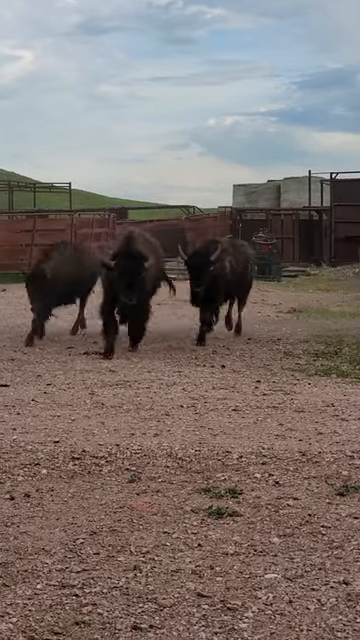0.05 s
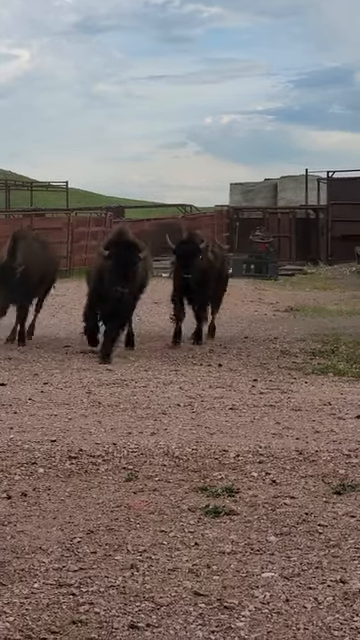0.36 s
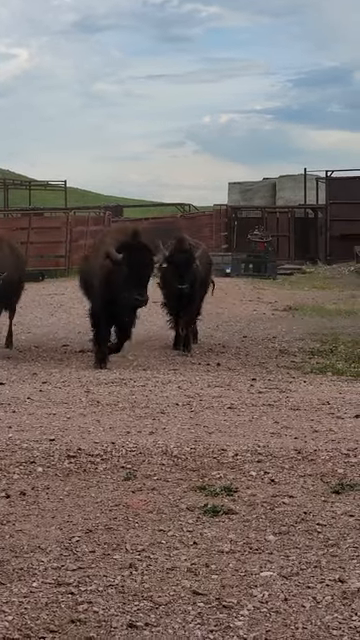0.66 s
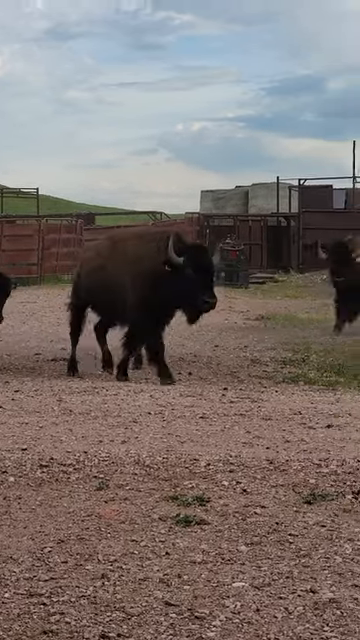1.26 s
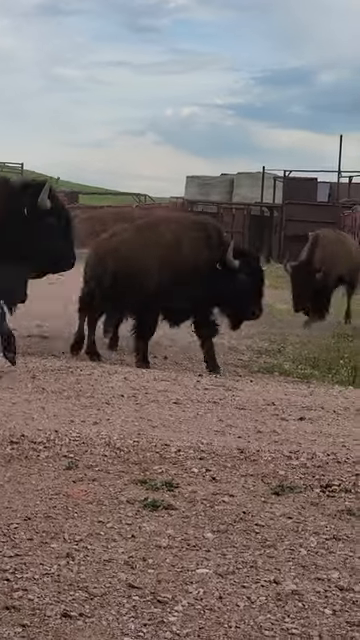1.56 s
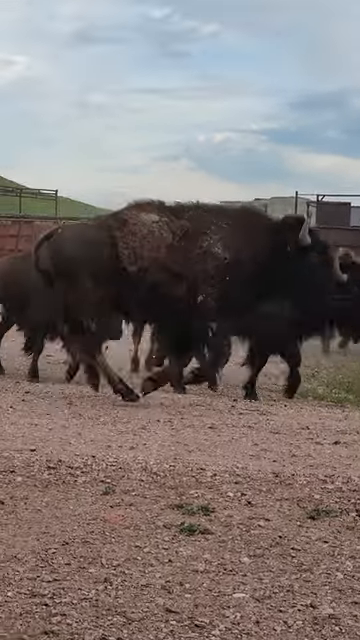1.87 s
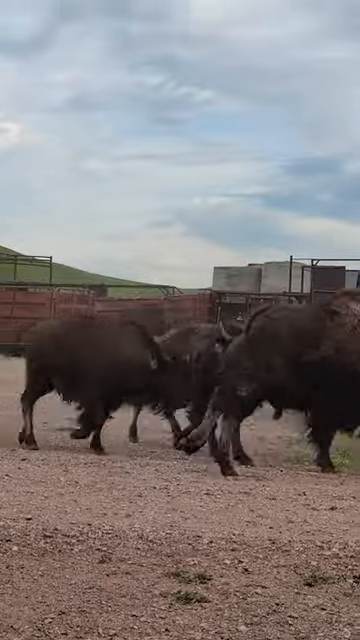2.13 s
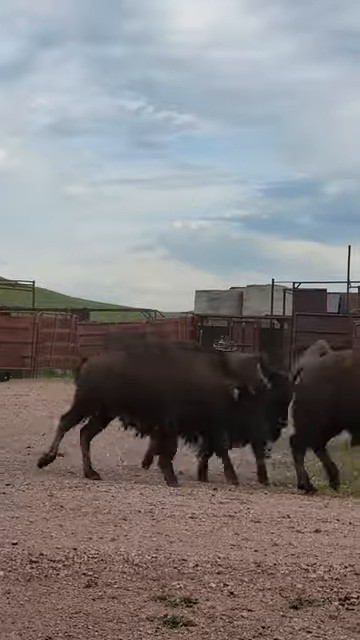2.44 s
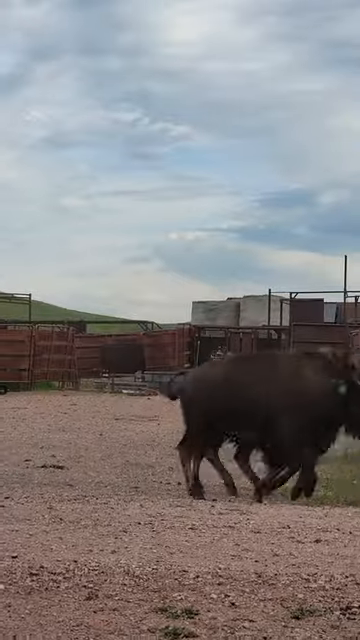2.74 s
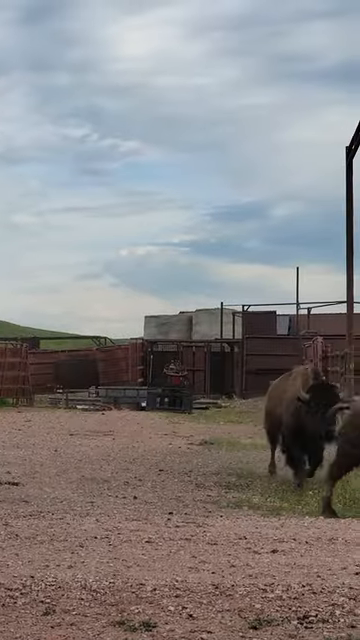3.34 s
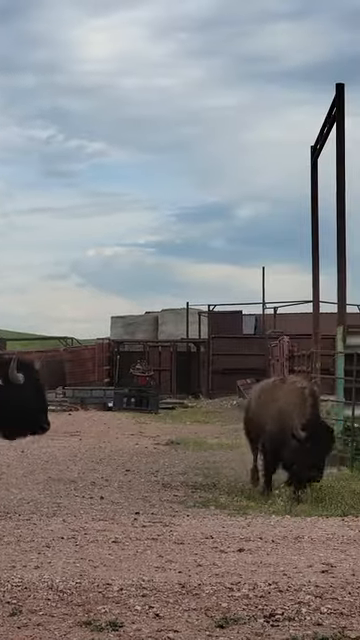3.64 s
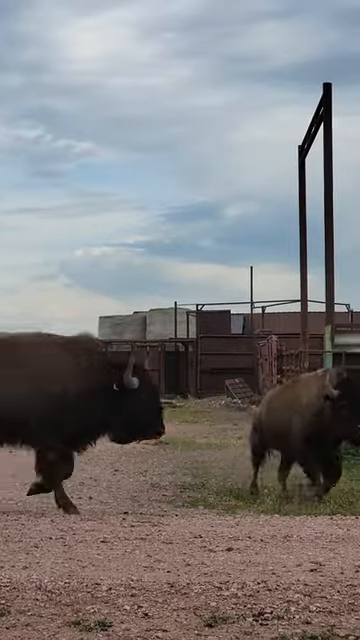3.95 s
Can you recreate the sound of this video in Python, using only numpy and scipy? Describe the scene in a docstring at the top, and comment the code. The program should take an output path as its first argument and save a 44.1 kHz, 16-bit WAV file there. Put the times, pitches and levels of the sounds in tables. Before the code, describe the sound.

Bison hooves thudding, clacking and crunching on gravel as the animals trot past outdoors.

```python
"""Bison trot past on a gravel yard: hooves thud on the ground, knock stones together and crunch the grit.
The animals snort through chest and nose, once farther off, then twice close by.
A bird whistles twice and a bit of metal tinkles; fences and sheds answer faintly.
An engine idles some way off and wind rumbles and thumps on the microphone."""
import sys
import numpy as np
from scipy import signal
from scipy.fft import rfft, irfft, next_fast_len
from scipy.io import wavfile
from scipy.ndimage import map_coordinates

SR = 44100
rng = np.random.default_rng(int(sys.argv[2]) if len(sys.argv) > 2 else 0)


def file_out(sig):
    """Save sig as 16-bit WAV at sys.argv[1]."""
    # one column per channel
    cols = np.atleast_2d(sig).T
    # limit, then scale
    lim = np.clip(cols, -1, 1)
    pcm = np.round(lim * 32767).astype(np.int16)
    wavfile.write(sys.argv[1], SR, pcm)


N = 176400
TIME_S = np.arange(N) / SR
EVENT_N = SR // 4
AGE_S = np.arange(EVENT_N) / SR


def amp(db):
    """Decibels to gain."""
    return 10 ** (np.asarray(db) / 20)


def unit(x):
    """Scale to rms 1."""
    return x / np.sqrt(np.mean(x ** 2) + 1e-20)


def fade(t60, t=AGE_S):
    """Exponential decay, 60 dB down at t60."""
    return amp(-60 * t / t60)


def curve(rows, column=1):
    """One column of a time table, per sample."""
    rows = np.array(rows)
    return np.interp(TIME_S, rows[:, 0], rows[:, column])


def gate(rows):
    """Open between a table's first and last time."""
    return (TIME_S > rows[0][0]) & (TIME_S < rows[-1][0])


def wobble(rate_hz):
    """Smooth random drift, rms near 1."""
    return map_coordinates(rng.standard_normal(int(4 * rate_hz) + 5), [TIME_S * rate_hz])


def filtered(x, response):
    """Apply a frequency response."""
    size = next_fast_len(x.shape[-1] + 8192)
    spectrum = rfft(x, size) * response(np.fft.rfftfreq(size, 1 / SR))
    return irfft(spectrum, size)[..., :x.shape[-1]]


def noise(spectrum):
    """Two independent shaped noises, rms 1."""
    hz, db = np.transpose(spectrum)
    white = rng.standard_normal((2, N))
    return unit(filtered(white, lambda f: amp(np.interp(np.log(f + 1), np.log(hz + 1), db))))


def pan(x, left_db):
    """Set the left level relative to the right."""
    return x * amp(np.array([[left_db], [-left_db]]) / 2)


def spread(pair, side_db):
    """Mid and side to left and right."""
    return pair[0] + amp(side_db) * pair[1] * np.array([[1], [-1]])


def add(out, start_s, x):
    """Mix x in at start_s."""
    i = max(round(start_s * SR), 0)
    out[:, i:i + x.shape[-1]] += x[..., :max(N - i, 0)]


def puff(hz):
    """Short stereo noise in a broad band around hz."""
    white = rng.standard_normal((2, EVENT_N))
    band = filtered(white, lambda f: (f / hz) ** 2 / (1 + 1j * f / hz) ** 5)
    return spread(unit(band), side_db=-7)


def grains(n, per_s, hz, t60_cycles, scatter, size_db, side_db):
    """Stereo cloud of tiny damped rings of random pitch, size and place."""
    count = int(per_s * n / SR) + 1
    draws = np.random.default_rng(rng.integers(1 << 30)).random((count, 4))
    onset, pitch, size, place = np.hsplit(draws, 4)
    detune = np.log((pitch + 1e-6) / (1 + 1e-6 - pitch)) / np.sqrt(np.pi)  # logistic distribution
    grain_hz = np.clip(hz * np.exp(scatter * detune), hz / 4, SR / 3)
    offsets = np.arange(int(2 * t60_cycles * SR / hz))
    cycles = grain_hz * offsets / SR
    rings = np.sin(2 * np.pi * cycles) * fade(t60_cycles, cycles) * amp(-size_db * np.log(size + .003))
    indices = ((onset * n).astype(int) + offsets).ravel()
    mid = np.bincount(indices, rings.ravel(), n)[:n]
    side = np.bincount(indices, (rings * (place - .5)).ravel(), n)[:n]
    return spread([unit(mid), unit(side)], side_db)


# open-air spectrum (frequency [Hz], relative level [dB])
AIR_SPECTRUM = [(120, 6.5), (280, -7), (450, -31), (950, -29), (1400, -10.5), (1850, -48), (3000, -26.5),
                (9000, -41), (15800, -43.5)]


def air():
    """Steady open-air noise with a slight flutter."""
    return spread(noise(AIR_SPECTRUM), side_db=-10) * amp(-43.5 + wobble(8.02))


# wind rumble spectrum (frequency [Hz], relative level [dB])
WIND_SPECTRUM = [(24, -28), (42, 6), (80, 11), (120, -4.5), (220, -12.5), (500, -36), (1500, -77.5)]
# wind strength (time [s], level [dB])
WIND_LEVELS = [(0, -28), (.55, -43), (.95, -26.5), (1.25, -33.5), (2.0, -24), (2.25, -34.5), (3.6, -48),
               (4, -37)]


def wind(gust_db=2.2):
    """Gusts buffet the two microphone ports."""
    rumble = noise(WIND_SPECTRUM) * amp(curve(WIND_LEVELS) + gust_db * wobble(23.35))
    return pan(rumble, left_db=-5)


# swish spectrum (frequency [Hz], relative level [dB])
SWISH_SPECTRUM = [(1500, -0.5), (7500, -3.5), (15000, -3)]
# swish envelope (time [s], level [dB])
SWISH_LEVELS = [(1.08, -72), (1.19, -55), (1.255, -49), (1.295, -52), (1.32, -78)]


def swish():
    """One soft, high hiss swells and stops."""
    hiss = spread(noise(SWISH_SPECTRUM), side_db=.5)
    return pan(hiss * amp(curve(SWISH_LEVELS)) * gate(SWISH_LEVELS), left_db=-7)


# idle harmonics (order, rms level [dB])
ENGINE_ORDERS = [(1, -42.5), (2, -34), (3, -46.5), (4, -48), (8, -56)]


def engine(idle_hz=30.37, waver_db=.5):
    """Distant idle: only the low orders carry, wavering slightly."""
    phase = 2 * np.pi * np.cumsum(idle_hz * (1 + .0048 * wobble(2.977))) / SR
    hum = np.zeros(N)
    for order, db in ENGINE_ORDERS:
        peak = np.sqrt(2) * amp(db - waver_db * wobble(4.5))
        hum += peak * np.sin(order * phase + rng.uniform(0, 2 * np.pi))
    return hum


def yard(x, t60_s=.075, cutoff_hz=4000, delay_s=.004):
    """Short reverberation off fences and sheds."""
    tail = filtered(rng.standard_normal((2, EVENT_N)), lambda f: 1 / (1 + 1j * f / cutoff_hz))
    tail *= fade(t60_s) * (AGE_S > delay_s)
    return signal.fftconvolve(x, tail / np.linalg.norm(tail[0]), axes=1)[:, :N]


# bird whistles, one curve each (time [s], pitch [Hz], level [dB])
WHISTLES = [
    [(.228, 4960, -66), (.237, 4540, -50), (.268, 3594, -54), (.315, 3520, -48), (.385, 3560, -62)],
    [(2.57, 3355, -60), (2.68, 3340, -48)],
]


def bird():
    """Two thin whistles: one falls and holds, the other swells on a near-steady pitch."""
    out = np.zeros(N)
    for note in WHISTLES:
        phase = 2 * np.pi * np.cumsum(curve(note)) / SR
        out += np.sin(phase) * amp(curve(note, column=2)) * gate(note)
    return out


# modes of a bit of metal (frequency [Hz], level [dB], t60 [s])
METAL_MODES = [(9243, -55, .2), (12910, -51, .35), (14660, -53, .18)]


def tinkle(start_s=2.546):
    """A small piece of metal is jogged and rings."""
    out = np.zeros((2, N))
    for hz, db, t60_s in METAL_MODES:
        add(out, start_s, amp(db) * fade(t60_s) * np.sin(2 * np.pi * hz * AGE_S))
    return out


# snorts (time [s], length [s], level [dB], chest resonance [Hz], chest gain [dB])
SNORT_BLASTS = [(0.44, 0.063, -53, 337, 7.5), (3.819, 0.027, -33, 271.6, 5),
                (3.876, 0.026, -33.5, 281, -4.5)]
# nose resonances (ratio to chest resonance, width [Hz], gain [dB])
NOSE_MODES = [(2.05, 60, 0), (2.7, 300, -3), (4, 400, -5), (8.5, 1500, -10)]


def snorts(chest_width_hz=35):
    """Air blasts through chest and nose; higher resonances die sooner."""
    out = np.zeros((2, N))
    for start_s, length_s, db, chest_hz, chest_db in SNORT_BLASTS:
        for ratio, width_hz, gain_db in [(1, chest_width_hz, chest_db), *NOSE_MODES]:
            hz = chest_hz * ratio
            white = rng.standard_normal(EVENT_N)
            breath = filtered(white, lambda f: (f * width_hz / (hz**2 - f**2 + 1j * f * width_hz)) ** 2)
            progress = AGE_S / length_s * ratio ** .3
            blast = (1 - np.exp(-(10 * progress) ** 2)) / (1 + progress ** 4)
            blast_rms = np.sqrt(np.mean(blast ** 2))
            add(out, start_s, amp(db + gain_db) * blast_rms * unit(breath * blast))
    return pan(out, left_db=-7)


# loose grit stirred by the herd (time [s], level [dB])
GRIT_LEVELS = [(0, -55), (.7, -56.5), (1.6, -59), (3.3, -57.5), (4, -53.5)]
# dull trampling of farther hooves (time [s], level [dB])
TRAMPLE_LEVELS = [(0, -45), (.75, -47), (2.6, -50.5), (4, -44.5)]


def herd(scuff_db=-8.5):
    """Many lesser steps: flurries of grit over scuffing and dull trampling."""
    grit = grains(N, per_s=1000, hz=2600, t60_cycles=12, scatter=.45, size_db=3, side_db=-1)
    scuff = grains(N, per_s=700, hz=1080, t60_cycles=5, scatter=.4, size_db=2, side_db=-3)
    trample = grains(N, per_s=300, hz=312, t60_cycles=4, scatter=.5, size_db=2.5, side_db=-9)
    flurry_db = 4 * wobble(23.74)
    ground = (trample + scuff * amp(scuff_db + flurry_db / 2)) * amp(curve(TRAMPLE_LEVELS))
    return grit * amp(curve(GRIT_LEVELS) + flurry_db) + pan(ground, left_db=-.5)


# gravel chips snapping (time [s], level [dB])
CHIP_SNAPS = [(.1256, -39.5), (1.366, -42), (1.405, -45), (2.405, -34.5), (2.544, -44.5), (2.62, -44),
              (2.823, -43), (3.146, -50), (3.741, -39), (3.8616, -42), (3.9075, -30.5)]


def snaps():
    """Single chips give way with a sharp, bright tick."""
    out = np.zeros((2, N))
    for start_s, db in CHIP_SNAPS:
        add(out, start_s, amp(db) * puff(hz=7000) * fade(t60=.022))
    return out


def gravel(hz):
    """Grinding gravel; each patch of ground has its own grain size."""
    patch_hz = hz * np.exp(rng.normal(0, .098))
    return grains(EVENT_N, per_s=2600, hz=patch_hz, t60_cycles=11, scatter=.42, size_db=3.5, side_db=1.5)


# gravel sliding under a hoof (time [s], length [s], level [dB])
GRAVEL_SLIDES = [(0.047, 0.02, -51.5), (0.38, 0.011, -43.5), (0.599, 0.049, -47), (0.859, 0.032, -51),
                 (1.099, 0.013, -47), (1.518, 0.0076, -43), (1.744, 0.0086, -38.5), (1.769, 0.0087, -38.5),
                 (2.364, 0.0079, -46), (2.452, 0.013, -46), (2.542, 0.02, -49), (3.078, 0.018, -40),
                 (3.447, 0.021, -48.5), (3.528, 0.02, -43), (3.62, 0.045, -49.5), (3.737, 0.016, -39),
                 (3.81, 0.1, -46), (3.897, 0.036, -39), (3.976, 0.022, -40)]


def crunches(rise_s=.004, sand_db=-7):
    """Gravel grinds as a hoof pushes off; fine sand sprays at the first bite."""
    out = np.zeros((2, N))
    for start_s, length_s, db in GRAVEL_SLIDES:
        sand = grains(EVENT_N, per_s=2600, hz=8340, t60_cycles=4, scatter=.3, size_db=4, side_db=-2)
        spray = amp(sand_db) * sand * fade(3 * length_s)
        push = (1 - np.exp(-AGE_S / rise_s)) / (1 + (AGE_S / length_s) ** 4)
        add(out, start_s, amp(db) * (gravel(hz=3560) + spray) * push)
    return out


# stones struck by a hoof (time [s], level [dB], pitch [Hz])
STONE_HITS = [(.3839, -33, 2910), (.572, -20, 1430), (.612, -33, 1350), (.6765, -29, 2120),
              (.7363, -32, 1700), (1.0148, -35, 3100), (1.11, -34, 2400), (1.2, -28, 1780),
              (1.52, -38, 1320), (1.7005, -30, 1550), (1.7435, -29, 1550), (1.8065, -28, 1520),
              (1.9575, -34, 1100), (2.31, -34, 1150), (2.404, -30, 3090), (2.6195, -29, 3200),
              (2.6745, -29, 2730), (2.9805, -28, 1490), (3.1449, -26, 2660), (3.662, -23, 1990)]
# stone modes (pitch ratio, gain [dB], t60 at reference pitch [s])
STONE_MODES = [(.72, -14, .011), (1, -1.5, .022), (1.13, -7, .017), (1.42, -14, .012), (2.4, -19, .011)]


def clacks(reference_hz=1600, rise_s=.0003):
    """A hoof slaps a stone, which cracks against its neighbours and rings while grit settles."""
    out = np.zeros((2, N))
    attack = 1 - np.exp(-AGE_S / rise_s)
    for start_s, db, hz in STONE_HITS:
        ring = np.zeros(EVENT_N)
        for ratio, gain_db, t60_s in STONE_MODES:
            # smaller, higher stones die sooner
            envelope = amp(gain_db + rng.normal(0, 1)) * fade(t60_s * reference_hz / hz)
            ring += envelope * np.sin(2 * np.pi * (hz * ratio * AGE_S + rng.random()))
        crack = amp(-6) * puff(hz) * fade(t60=.02)
        settle = amp(-19) * gravel(hz) * fade(t60=.08)
        slap = amp(-38) * puff(hz=750) * fade(t60=.03)
        add(out, start_s, (amp(db) * (ring + crack + settle) + slap) * attack)
    return pan(out, left_db=-2.5)


# hoof walls landing (time [s], level [dB], pitch [Hz])
HOOF_KNOCKS = [(0.261, -26.5, 420), (0.773, -29, 220), (0.862, -33, 247), (1.11, -23.5, 250),
               (1.518, -29, 234), (1.906, -28.5, 170)]


def knocks(slap_db=-7, t60_s=.03):
    """A hoof wall hits packed dirt: a dull tone with a noisy slap."""
    out = np.zeros((2, N))
    for start_s, db, hz in HOOF_KNOCKS:
        impact = amp(slap_db) * puff(2 * hz) - np.sin(2 * np.pi * hz * AGE_S)
        add(out, start_s, amp(db) * fade(t60_s) * impact)
    return pan(out, left_db=-9)


# footfalls and wind buffets (time [s], peak [dB], pitch [Hz], left over right [dB])
LOW_THUMPS = [(.145, -24, 62, -10), (.9, -25, 80, -8), (1.016, -22, 66, 0), (1.07, -21, 66, 8),
              (1.53, -19, 56, -2), (1.825, -23, 70, -10), (1.93, -22, 72, -9), (2.022, -19, 80, -10),
              (2.059, -15, 82, -4), (2.468, -23, 56, -9), (2.66, -21, 68, -9), (2.705, -17, 70, 3),
              (3.385, -22, 70, 10), (3.897, -24, 95, -4), (3.936, -26, 85, -5)]


def thumps(rise_s=.011, t60_s=.15):
    """Low thumps: heavy footfalls, and wind buffets on the left of the microphone."""
    out = np.zeros((2, N))
    swell = (1 - np.exp(-(AGE_S / rise_s) ** 2)) * fade(t60_s)
    swell /= swell.max()
    for start_s, db, hz, left_db in LOW_THUMPS:
        add(out, start_s, pan(amp(db) * swell * np.sin(2 * np.pi * hz * AGE_S), left_db))
    return out


def scene(right_lead_s=.00005, yard_db=-15):
    """The herd is to the right, so near sounds reach the left slightly later."""
    near = clacks() + crunches() + snaps() + knocks() + thumps() + snorts() + bird() + tinkle()
    near = filtered(near, lambda f: np.exp(1j * np.pi * f * right_lead_s * np.array([[-1], [1]])))
    return near + amp(yard_db) * yard(near) + herd() + engine() + wind() + air() + swish()


def record(dry):
    """Band limit: first-order high-pass, hard treble cut."""
    low_hz, top_hz = 20, 15950
    return filtered(dry, lambda f: (f < top_hz) * 1j * f / (low_hz + 1j * f))


dry = scene()
out = record(dry)
file_out(out)
```